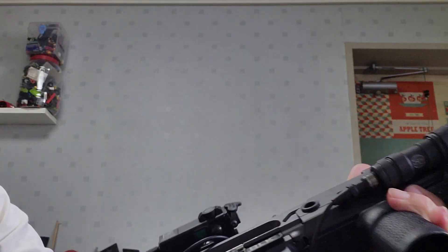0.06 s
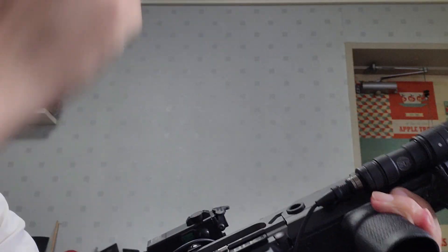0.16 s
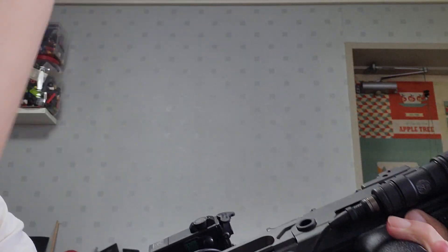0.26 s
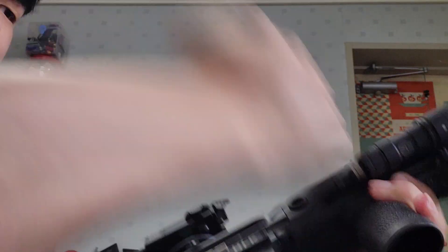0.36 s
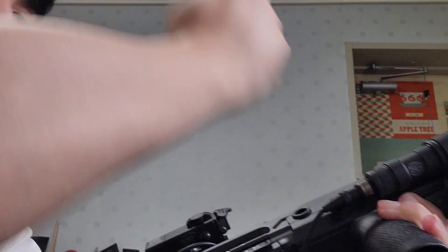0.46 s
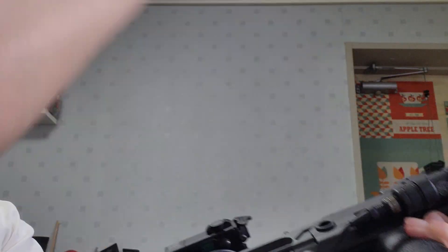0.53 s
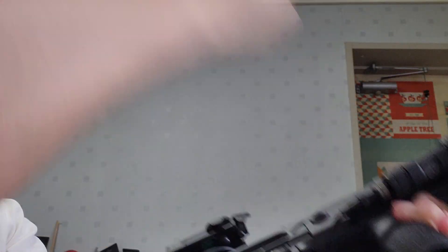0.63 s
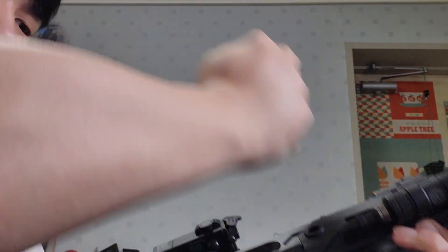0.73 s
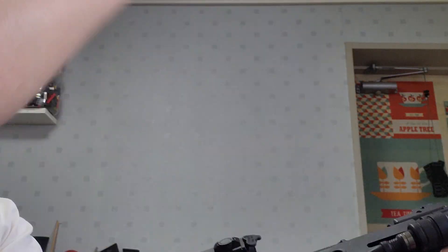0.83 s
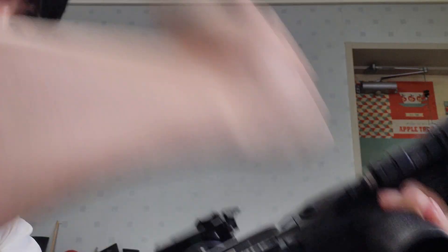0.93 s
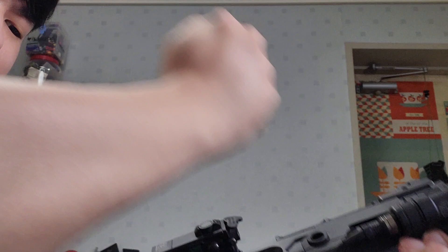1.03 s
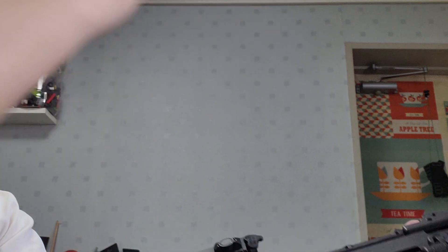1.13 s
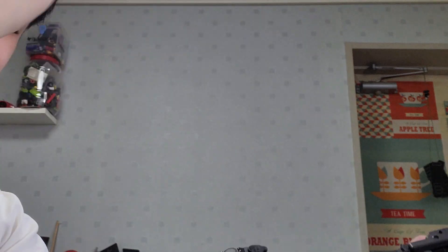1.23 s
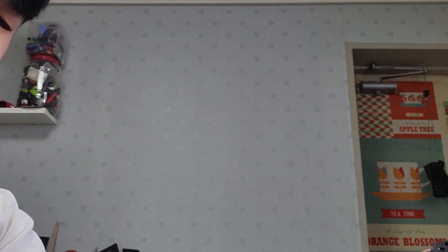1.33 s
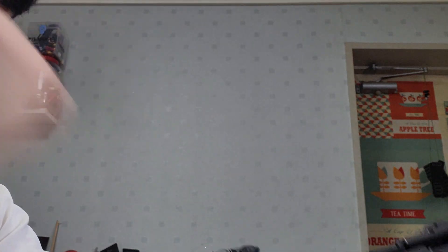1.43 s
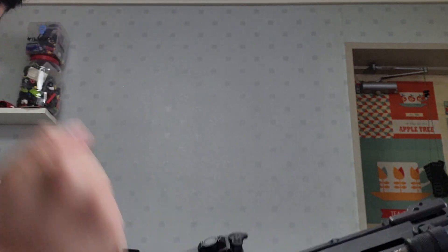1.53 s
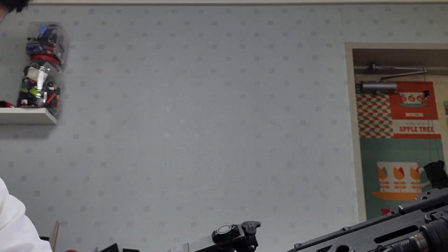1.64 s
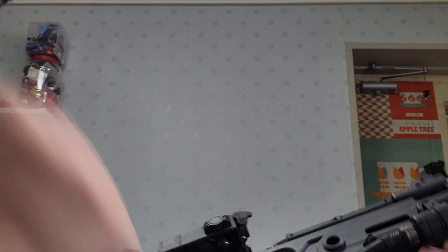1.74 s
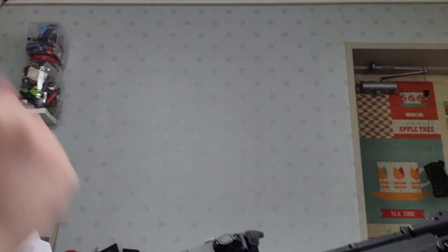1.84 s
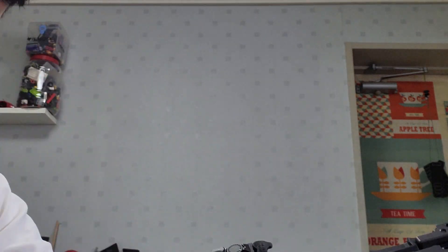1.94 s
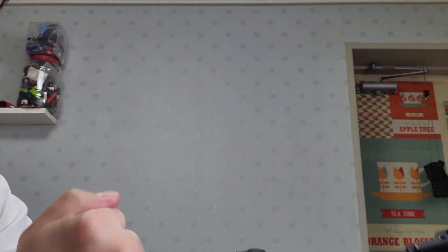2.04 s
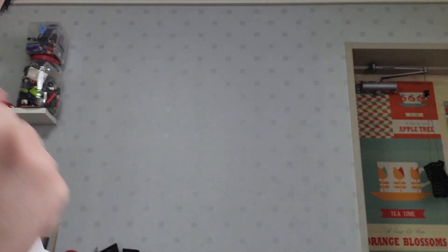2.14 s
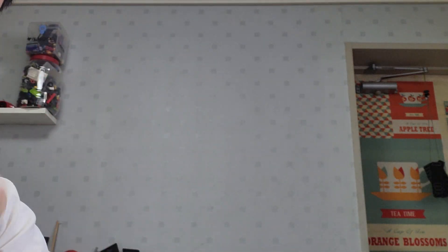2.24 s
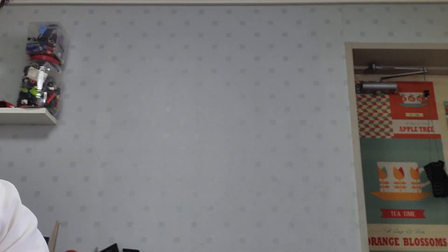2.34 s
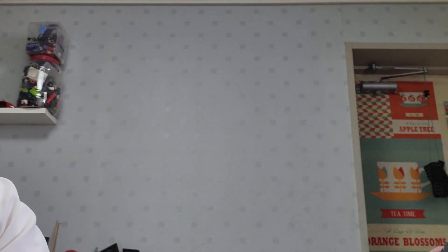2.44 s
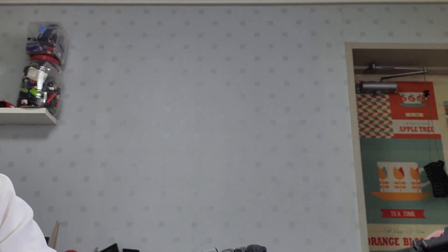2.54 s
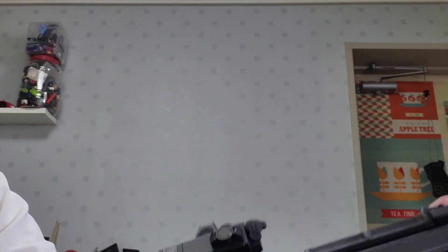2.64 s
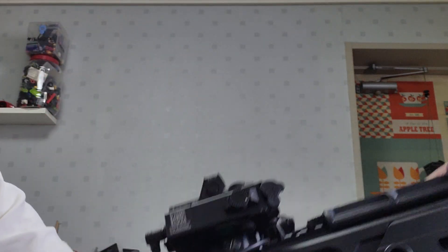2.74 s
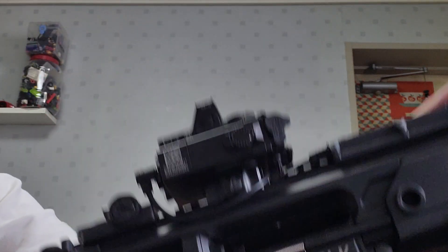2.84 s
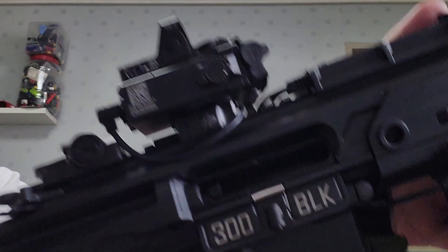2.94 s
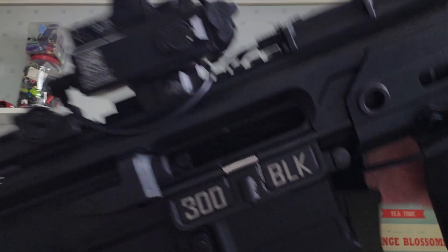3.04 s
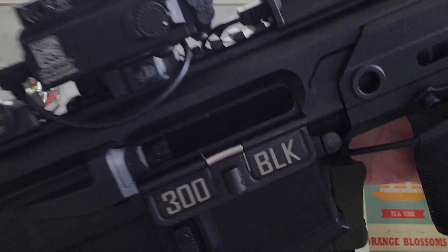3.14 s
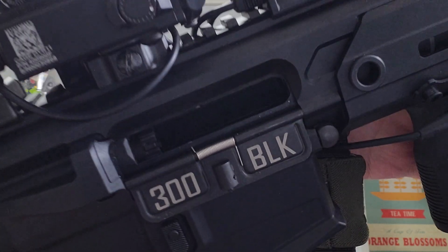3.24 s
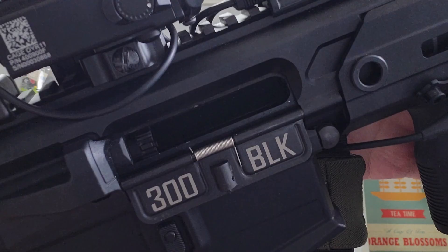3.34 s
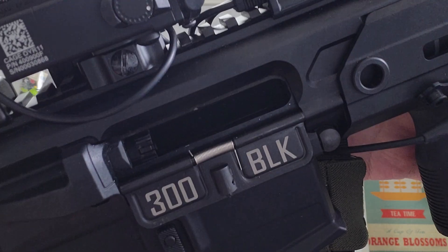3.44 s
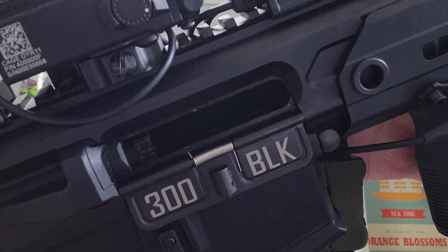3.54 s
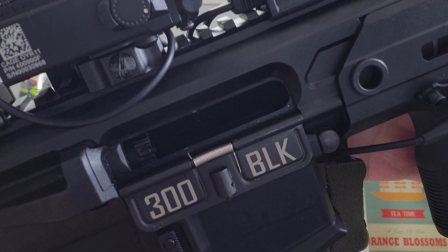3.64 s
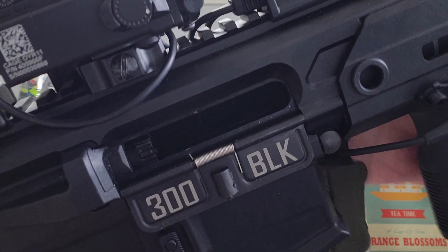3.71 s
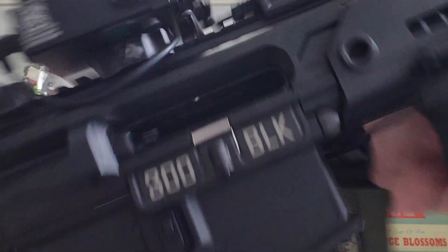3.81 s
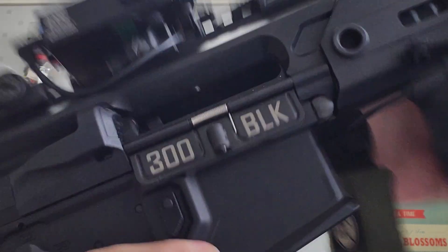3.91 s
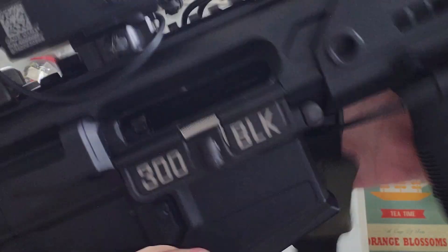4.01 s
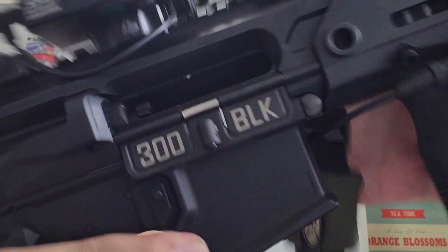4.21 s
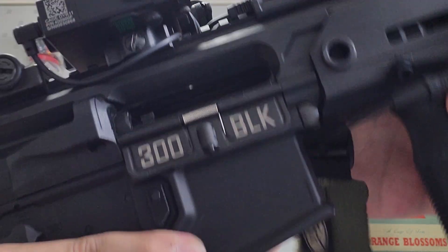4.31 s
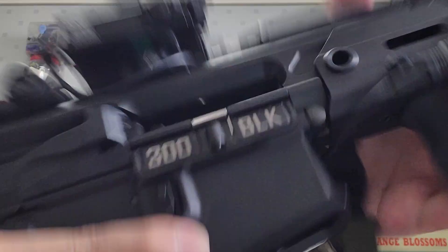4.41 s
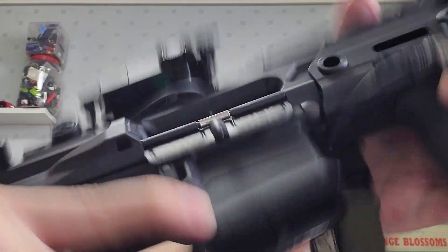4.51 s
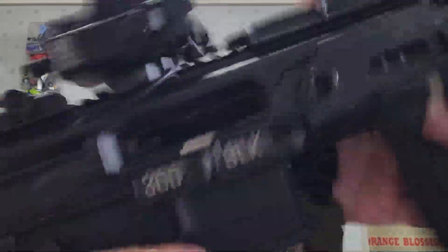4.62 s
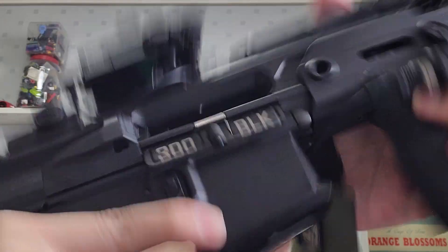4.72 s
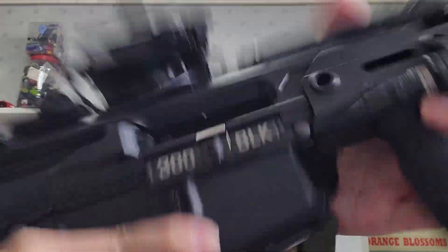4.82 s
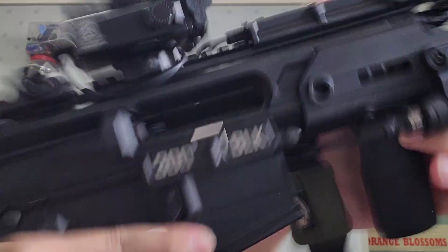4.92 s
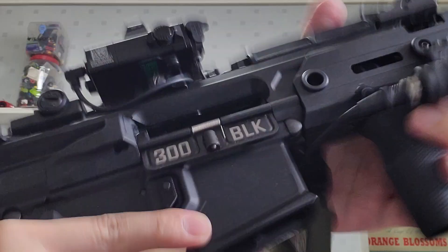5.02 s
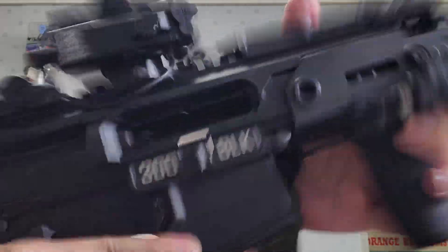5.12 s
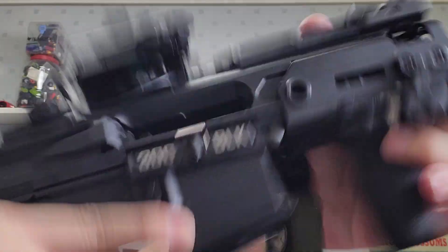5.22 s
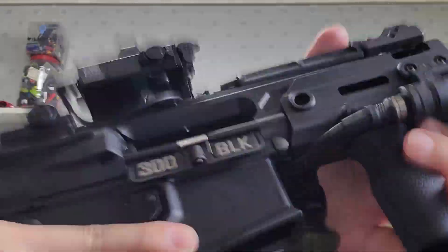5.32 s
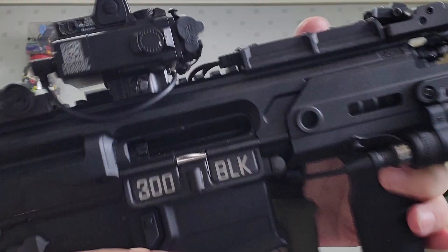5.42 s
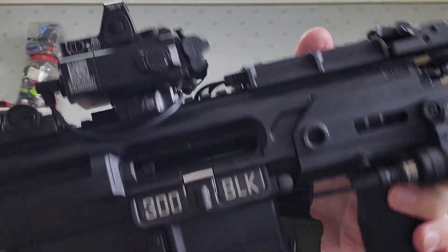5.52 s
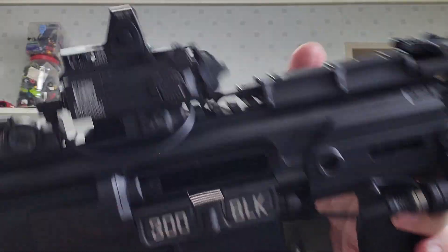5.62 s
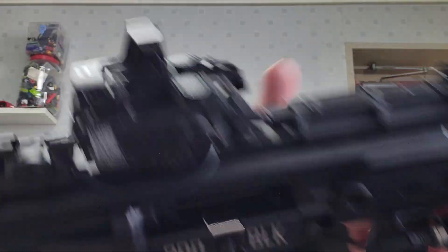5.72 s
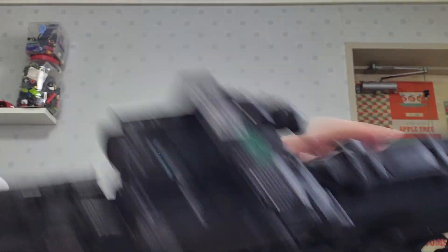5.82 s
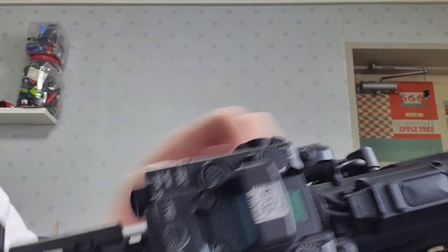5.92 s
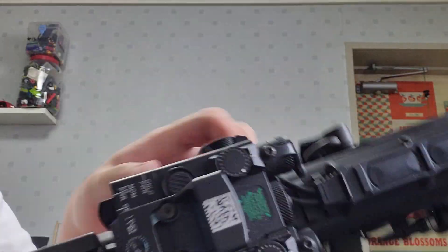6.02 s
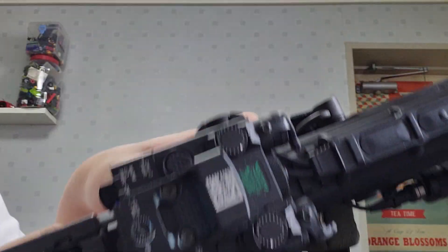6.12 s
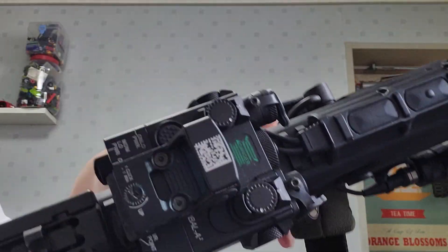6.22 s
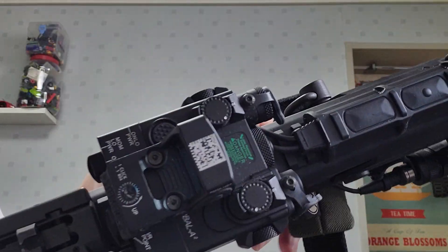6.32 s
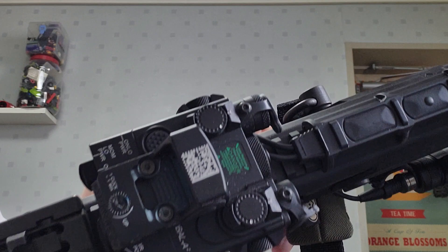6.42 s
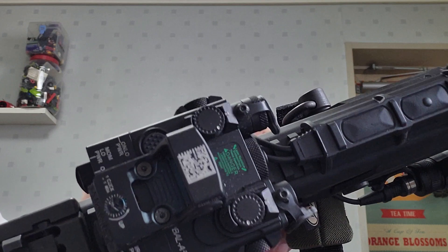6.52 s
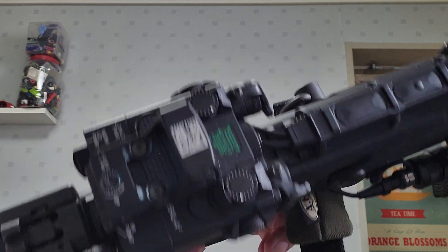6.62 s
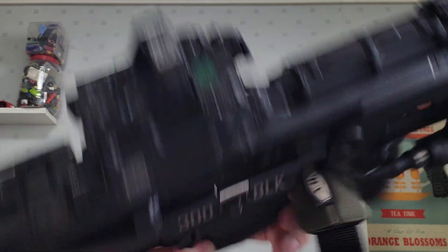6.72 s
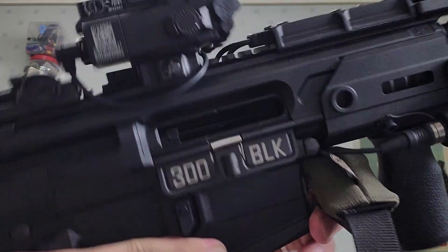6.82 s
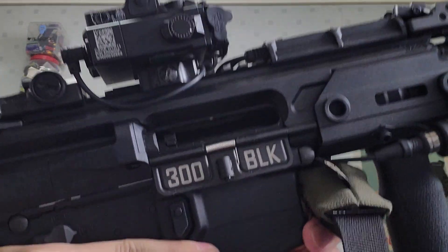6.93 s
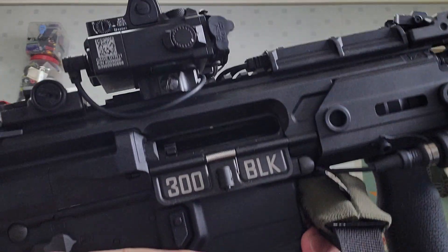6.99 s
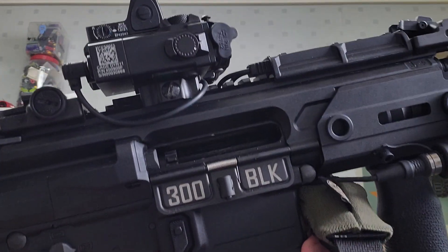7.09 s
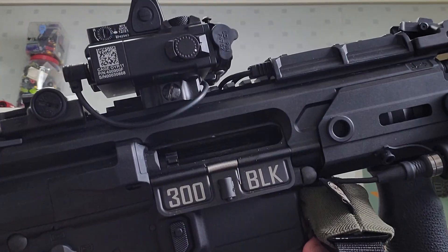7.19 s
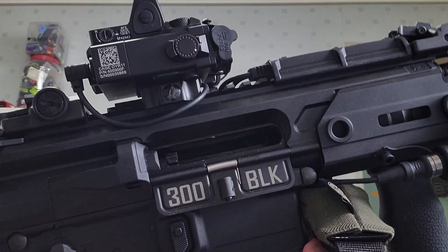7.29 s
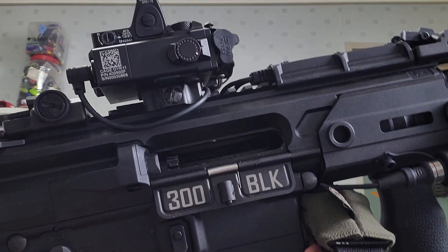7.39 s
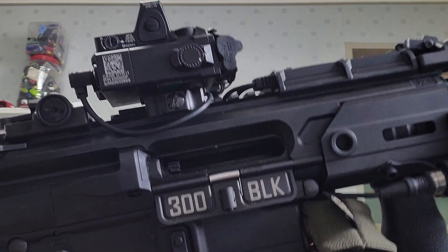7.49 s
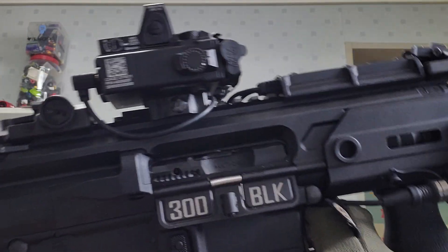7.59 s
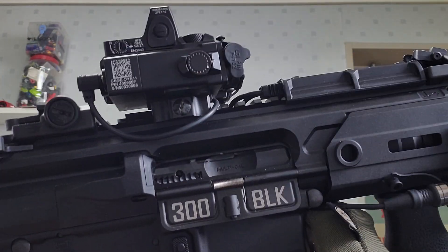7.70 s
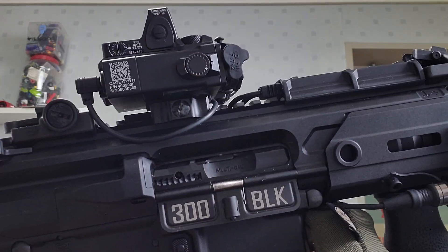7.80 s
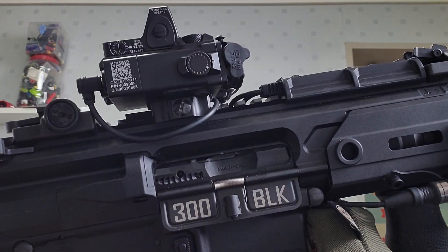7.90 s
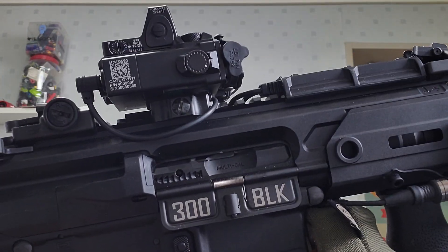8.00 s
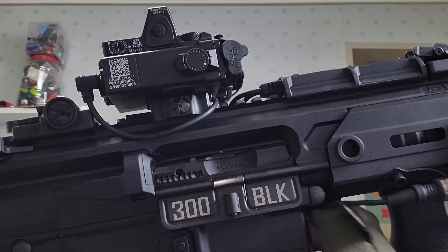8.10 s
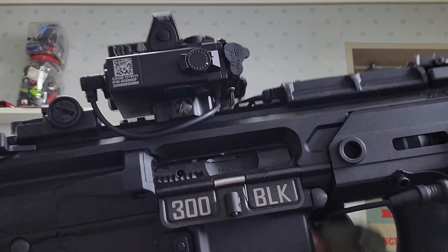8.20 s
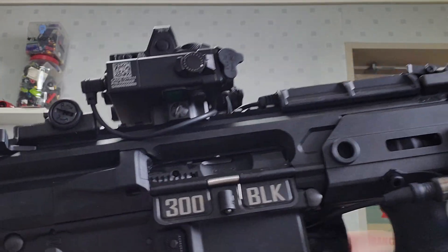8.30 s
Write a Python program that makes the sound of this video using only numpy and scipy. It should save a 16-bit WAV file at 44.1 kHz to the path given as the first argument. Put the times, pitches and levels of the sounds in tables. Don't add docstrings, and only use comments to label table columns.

```python
import sys
import numpy as np
from scipy import signal
from scipy.fft import rfft, irfft
from scipy.io import wavfile
from scipy.ndimage import map_coordinates

SR = 44100
rng = np.random.default_rng(int(sys.argv[2]) if len(sys.argv) > 2 else 0)


def store_pcm(level_fs):
    pcm = np.round(np.clip(level_fs, -1, 1) * 32767).astype(np.int16)
    wavfile.write(sys.argv[1], SR, np.atleast_2d(pcm).T)


def boost_factor(decibels):
    exponent = np.asarray(decibels, float) / 20
    return 10 ** exponent


N = 368235

# (frequency [Hz], density [dB/Hz])
HUM_SPECTRUM = [(15, -50.5), (25, -11), (58, 5), (91, -3.5), (119, 6.5), (300, -6), (357, -3.5), (468, -5),
                (649, -9.5), (1350, -18), (2500, -32), (3250, -47.5), (5500, -120)]
# (frequency [Hz], density [dB/Hz])
HISS_SPECTRUM = [(880, -36.5), (1600, -13), (2100, -8), (2680, -8), (3120, -16.5), (4340, -28),
                 (9410, -29.5), (15100, -25.5), (16500, -40)]
# (time [s], level [dB])
MACHINE_LEVEL = [(0, -92.5), (2.3, -88.5), (3.4, -85), (6.5, -67.5), (7.55, -69.5), (7.75, -100),
                 (8.35, -100)]
# (time [s], level [dB])
FAN_LEVEL = [(5.4, -100), (5.75, -65), (6.4, -67), (7.5, -68), (7.6, -100)]
# (frequency [Hz], width [Hz], level [dB])
FAN_PEAKS = [(365, 30, 0), (450, 30, 2), (2100, 110, -11), (2450, 130, -20), (2730, 30, -16)]
# (time [s], pitch [Hz], level [dB])
BEARING_WHINE = [(5.6, 2750, -100), (5.8, 2745, -77), (6.6, 2725, -77), (7.0, 2670, -81), (7.5, 2650, -86),
                 (7.6, 2650, -110)]
# (time [s], pitch [Hz], level [dB])
SPRING_SQUEAK = [(7.24, 8700, -110), (7.27, 9200, -86), (7.31, 10050, -78), (7.44, 10200, -74),
                 (7.5, 8900, -77.5), (7.53, 8500, -110)]

# (frequency [Hz], density [dB/Hz])
CLOTH_SPECTRUM = [(410, -27.5), (700, -4.5), (974, -2.5), (1810, -4), (2100, -5), (9000, -5), (12700, -7),
                  (15700, -13), (16500, -34.5)]
# (time [s], rustle level [dB])
MOTION = [(0, -71), (1.2, -71), (1.46, -79), (3.41, -79.5), (3.79, -72.5), (4.1, -61), (4.45, -64),
          (4.6, -49), (4.85, -46), (5.25, -46), (5.56, -63.5), (6.29, -71), (6.4, -100), (6.65, -80),
          (7.1, -78.5), (7.8, -85.5), (8.0, -95), (8.35, -90)]
# (time [s], peak level [dB], half length [s])
SWISHES = [(0.073, -63, 0.034), (0.318, -71, 0.029), (0.593, -57.5, .04), (0.896, -58, 0.021),
           (1.174, -59, 0.038), (1.391, -76, 0.021), (2.05, -74, .25), (2.626, -73, 0.0083),
           (2.729, -62, 0.066), (2.885, -63, 0.094), (3.1, -66, 0.019), (3.18, -75, 0.025),
           (3.9, -68.5, 0.051), (4.036, -71, .03), (4.162, -63, 0.026), (4.59, -59, 0.01),
           (5.212, -42, 0.011), (5.456, -58, 0.077), (5.748, -55, 0.12), (6.082, -67.5, 0.024),
           (6.79, -62, 0.05), (6.868, -65.5, 0.075)]

# (time [s], deep boom [dB], upper boom [dB])
THUMPS = [(0.443, -29, -40), (0.732, -31, -39.5), (1.016, -32.5, -40.5), (1.528, -41, -32.5),
          (1.803, -36, -32.5), (2.063, -39.5, -32), (4.218, -41, -59), (4.729, -48.5, -61.5),
          (4.809, -37, -57), (4.964, -39, -69.5), (5.127, -41.5, -39), (5.3, -47, -42), (6.077, -74.5, -48),
          (7.556, -37, -39.5), (7.593, -46, -54)]
# (time [s], small parts [dB], stock knock [dB], decay [ms])
TICKS = [(0.0248, -32.5, -46, 3.5), (0.6144, -38, -41.5, 1.8), (0.9111, -50, -43, 2.5),
         (1.198, -57, -55.5, 1.9), (2.8009, -52, -38.5, 1.8), (2.8384, -53, -47.5, 2.4),
         (5.5329, -47.5, -42, .9), (5.591, -45, -48, 4.4), (5.6112, -49, -42.5, 2.3),
         (5.8366, -51, -37, 2.1), (5.9917, -54.5, -33, 2.3), (6.0555, -73, -38, 2.2),
         (6.0722, -40, -34, 2.2), (6.15, -61, -56, 3.8), (6.252, -62, -64.5, 3), (6.2659, -69.5, -61, 5.8),
         (6.297, -62.5, -62.5, 3.1), (6.7696, -38, -33, 1.36), (6.774, -55, -30, 1.4),
         (6.8476, -58, -46.5, 9.9), (6.8749, -50.5, -37, 0.85), (7.5332, -50.5, -37.5, 2.2),
         (8.1278, -78, -78, 3.1), (8.1983, -51, -69, 2.1), (8.2727, -39, -46, 2.9)]
# (time [s], small parts [dB], stock knock
# [dB], decay [ms])
STIR = [(3.9904, -43, -42, 1.9), (4.0126, -51.5, -32, 4.1), (4.0432, -36.5, -40, 3.8),
        (4.062, -45.5, -56, 2.5), (4.0835, -42, -50, 2.4), (4.1337, -44, -35.5, 1.74),
        (4.1767, -26.5, -36.5, 2), (4.216, -42.5, -25.5, 2.5), (4.2657, -40, -49, 1.5),
        (4.157, -38, -54, 2), (4.145, -52, -45, 2), (4.252, -41, -50, 2.5), (4.328, -64, -47, 3),
        (4.073, -48, -50, 2), (3.958, -62, -52, 2), (4.279, -37, -44.5, 1.7), (4.3903, -46, -42, 2.3),
        (4.4572, -36.5, -51, 1.6), (4.4834, -36, -53.5, 3.5), (4.508, -58, -36, 1.2),
        (4.5202, -38, -34.5, 2.2), (4.563, -46, -42, 3.9), (4.6232, -47.5, -24.5, 1.8),
        (4.9411, -38, -34, 6.23), (5.168, -31, -39, 5), (5.3114, -28, -28, 2.3), (5.4085, -30.5, -36, 3),
        (4.7101, -32, -36, 4.2)]
# (time [s], small parts [dB], stock knock [dB], decay [ms])
RATTLE = [(4.587, -16, -31, 2.7), (4.6456, -23.5, -32, 1.1), (4.6506, -21, -29.5, 3),
          (4.7333, -12.5, -50, 1.5), (4.7445, -25, -23, 4), (4.7953, -30.5, -28, 4.7),
          (4.8032, -25, -33, 3.8), (4.8126, -24.5, -16.5, 2.4), (4.8332, -12, -34, 1.9),
          (4.8761, -19.5, -27, 2.1), (4.9016, -15, -40, 3.2), (4.9735, -10, -28.5, 1.6),
          (4.9928, -24.5, -28, 2.3), (5.0013, -14, -30, 2), (5.0345, -28, -38, 2.5), (5.044, -22, -40, 4),
          (5.0065, -20, -34, 2.5), (5.2063, -30, -40, 2), (5.2175, -22, -40, 1.5), (5.289, -34, -36, 2.5),
          (5.3275, -22, -34, 2.5), (4.579, -34, -32, 4), (4.5925, -31, -30, 2), (4.6625, -27, -36, 2),
          (4.679, -31, -36, 3), (4.692, -34, -33, 2.5), (4.784, -33, -42, 2), (4.909, -27, -34, 3),
          (4.925, -28, -38, 2.5), (4.84, -26, -34, 3), (5.054, -28, -29, 3.9), (5.0659, -14.5, -40.5, 1.4),
          (5.0865, -30, -32, 2.6), (5.1124, -13.5, -35, 1.5), (5.12, -16, -23.5, 1.1),
          (5.1309, -10, -24.5, 1.8), (5.1475, -26.5, -27.5, 1.3), (5.2204, -7.5, -42, 2.6),
          (5.2627, -48.5, -27, 5.1), (5.2985, -16, -24.5, 1.5), (5.3216, -15.5, -33.5, 1.1),
          (5.3346, -25.5, -36, 4.4), (5.3661, -20.5, -50, 1.4), (5.3796, -20, -35, 1.9),
          (5.4402, -21, -15, 0.23)]
# (time [s], peak level [dB], frequency [Hz])
CHINKS = [(0.0243, -24, 3070), (0.614, -28, 4810), (2.8005, -36, 3890), (2.8379, -39, 3490),
          (4.0123, -32, 2830), (4.0427, -30, 4520), (4.0831, -37, 4170), (4.1565, -28, 2710),
          (4.1764, -20, 9590), (4.2153, -27, 3960), (4.2792, -30, 6720), (4.3899, -34, 2690),
          (4.4568, -30, 14000), (4.4832, -32, 7440), (4.5201, -29, 2530), (4.587, -10, 7480),
          (4.6503, -12, 5160), (4.6624, -26, 5280), (4.7102, -13, 3930), (4.7331, -9, 11700),
          (4.7454, -19, 5180), (4.8034, -16, 5520), (4.8334, -5, 6930), (4.8763, -16, 14000),
          (4.9023, -10, 11500), (4.9731, -7, 7800), (4.9924, -14, 5800), (5.001, -12, 9060),
          (5.0444, -18, 9640), (5.0654, -13, 6960), (5.0848, -18, 7900), (5.1118, -19, 3610),
          (5.1118, -11, 5870), (5.1302, -6, 6030), (5.1474, -18, 2590), (5.1696, -23, 5610),
          (5.2061, -10, 9240), (5.221, -4, 7250), (5.2974, -14, 6040), (5.3213, -12, 5880),
          (5.3657, -17, 9670), (5.3797, -18, 11600), (5.4081, -22, 5350), (5.4385, -18, 3640),
          (7.5822, -2, 9550), (7.6064, -6, 9530)]
# (time [s], frequency [Hz], level [dB], T60 [s])
RINGING_PARTS = [(0.445, 320, -30.5, 0.089), (0.734, 320, -34.5, 0.067), (0.76, 2458, -26, 0.11),
                 (1.016, 330, -39.5, 0.094), (1.034, 2460, -28.5, 0.12), (1.804, 740, -24, 0.079),
                 (2.066, 580, -24.5, 0.065), (3.084, 1103, -52, .012), (4.811, 1250, -16.5, 0.031),
                 (5.837, 1266, -36, 0.019), (5.59, 2830, -35, .04), (5.992, 1300, -36, 0.02),
                 (5.992, 2150, -36, .02), (6.072, 1324, -35, 0.031), (6.771, 1320, -32, 0.028),
                 (6.072, 2200, -26.5, 0.021), (6.262, 2750, -45, 0.054), (6.77, 2120, -31.5, 0.04),
                 (7.555, 2480, -18, .09), (7.566, 2620, -18, .06), (0.757, 9100, -23, .06),
                 (0.754, 13500, -14, .02), (0.775, 2330, -30, .07), (0.446, 1150, -24, .04),
                 (1.53, 4300, -18, .03), (4.014, 1300, -42, .05), (4.222, 600, -36, .05),
                 (7.635, 5200, -26, .1), (8.273, 5240, -50, .2), (7.5925, 9490, -9, 0.11),
                 (7.5923, 11240, -13, 0.1), (7.6, 5150, -18, .06), (7.619, 780, -21, 0.047),
                 (8.271, 9070, -31, 0.04)]
# (time [s], level [dB])
BOLT_SLIDE = [
    (7.553, -48.5),
    (7.557, -29.5),
    (7.575, -29),
    (7.59, -30),
    (7.6, -25.5),
    (7.63, -33),
    (7.66, -61),
]
# (time [s], small parts [dB], stock knock [dB], decay [ms])
RELEASE = [
    (7.5549, -9, -28, 1.7),
    (7.5673, -21, -36, 6.3),
    (7.5771, -11, -31, 1.8),
    (7.5812, -6, -28, 2.2),
    (7.592, -3, -25, 1.6),
    (7.6007, -14, -34.5, 2.9),
    (7.6074, -11.5, -31.5, 3.2),
    (7.6183, -13.5, -30.5, 1.9),
    (7.6234, -25, -32.5, 4.2),
    (7.6325, -20.5, -35, 2.2),
]
# (time [s], blow [dB], first touch [dB], stock knock [dB])
SLAMS = [
    (0.4447, -8, -12, -21),
    (0.7336, -9, -21, -24),
    (1.0155, -9, -28, -27),
    (1.5299, -4, -17, -21),
    (1.8028, -8, -16.5, -28),
    (2.0651, -8.5, -25.5, -22),
]
# (time [s], level [dB])
REBOUNDS = [(0.4537, -11), (0.4632, -11), (0.7448, -11), (0.7548, -7), (1.0268, -12), (1.0316, -10),
            (1.539, -8), (1.5507, -21), (1.814, -7), (1.8233, -19.5), (2.0773, -8), (2.094, -22.5)]
# (frequency [Hz], density [dB/Hz])
STEEL_SPECTRUM = [(180, -45.5), (300, -16), (780, -5.5), (938, -1.5), (3970, -5.5), (5930, -5), (9330, -3),
                  (10300, -6.5), (15200, -1.5), (16500, -28.5)]
# (frequency [Hz], level [dB])
RECEIVER_MODES = [(2466, -9), (4032, -6), (5329, -8), (6487, -6), (7510, -5), (7940, -6), (8511, -5),
                  (9060, -2), (9302, -3), (9857, -8), (10930, -8), (11530, -6), (13200, -4), (13600, -2)]

# (frequency [Hz], T60 [s])
ROOM_T60 = [(100, .35), (500, 0.18), (2000, 0.23), (8000, 0.2), (16000, 0.12)]
# (time [s], lag [ms], level [dB])
LEFT_LAG = [(0, .28, -1), (2.2, .33, -1.5), (3.0, .15, -1), (4.2, .15, 0), (6.5, .15, 0), (7.0, 0.157, 1),
            (7.5, .19, 1), (7.8, .19, -.5), (8.35, .3, 0)]
# (frequency [Hz], gain [dB])
LEFT_PORT = [(30, -7.5), (120, -2.5), (300, 0.5), (1300, -1.5), (2500, 0.5), (10500, 1), (13000, -9.5)]
# (frequency [Hz], gain [dB])
MICROPHONE = [(20, -0.5), (9000, -2), (13500, -2), (15800, 0), (16050, -14), (17000, -33.5)]

MACHINE_HUM_DB, ROOM_HUM_DB, ROOM_HUM_UNTIL_S = 6.5, -76, 6.4
HANDLING_DB, HANDLING_PER_MOTION_DB = -13, 0.72
AIR_DB, AIR_RE_MOTION_DB = -81, -5
RISE_RATE, FALL_RATE = 2.5, 1.6
SHAKE_FROM_S, SHAKE_TO_S = 4.8, 5.42
LOOSE_DB, LOOSE_STOCK_DB, LOOSE_SPREAD_DB, LOOSE_MS = -37, -37, 3, 2.5
CHINK_DB, CHINK_T60_S = -13, .016
TOUCH_BEFORE_MS, TOUCH_MS, BLOW_MS, REBOUND_MS = 3, 2.4, 2.6, 1.6
TOUCH_STOCK_DB, REBOUND_STOCK_DB, CHATTER_STOCK_DB = -9, -18.5, -9
CHATTER_DB, CHATTER_LOSS_DB = -13.5, 2.4
CHATTER_AFTER_MS, CHATTER_GAP_MS, CHATTER_MS = 13, 5.5, 2.1
RECEIVER_WIDTH_HZ, RECEIVER_DB = 70, 1


def rms_one(x):
    return x / np.sqrt(np.mean(x ** 2) + 1e-20)


def in_time(rows):
    s, *columns = np.transpose(rows)
    return [np.interp(np.arange(N) / SR, s, c) for c in columns]


def at_hz(points, hz):
    table_hz, values = np.array(points).T
    return np.interp(np.log(hz), np.log(table_hz), values)


def colour(x, spectrum):
    hz = np.linspace(0, SR / 2, 2049)
    gain = boost_factor(at_hz(spectrum, np.maximum(hz, 1)))
    cepstrum = irfft(np.log(gain + 1e-5))
    cepstrum[1:2048] *= 2
    cepstrum[2049:] = 0
    return signal.oaconvolve(x, irfft(np.exp(rfft(cepstrum))))[:N]


def noise(spectrum):
    return rms_one(colour(rng.standard_normal(N), spectrum))


def band(x, low_hz, high_hz):
    sos = signal.butter(2, [low_hz, high_hz], "band", fs=SR, output="sos")
    return signal.sosfilt(sos, x) * np.sqrt(SR / 2 / (high_hz - low_hz))


def resonance(x, hz, width_hz):
    r = np.exp(-np.pi * width_hz / SR)
    poles = [1, -2 * r * np.cos(2 * np.pi * hz / SR), r * r]
    return signal.lfilter([(1 - r * r) / 2, 0, (r * r - 1) / 2], poles, x)


def drift(rate_hz):
    r = np.exp(-80 * np.pi * rate_hz / SR)
    slow = signal.lfilter([1], [1, -2 * r, r * r], rng.standard_normal(N // 40 + 2002))[2000:]
    return np.interp(np.arange(N) / 40, np.arange(len(slow)), rms_one(slow))


def wavering_sine(hz, level_db):
    return np.sqrt(2) * boost_factor(level_db) * np.sin(2 * np.pi * np.cumsum(hz) / SR)


def hum(motion_db, machine_db):
    handling = boost_factor(HANDLING_DB + HANDLING_PER_MOTION_DB * motion_db)
    room_hum = boost_factor(ROOM_HUM_DB) * (np.arange(N) < ROOM_HUM_UNTIL_S * SR)
    level = np.hypot(handling + room_hum, boost_factor(machine_db + MACHINE_HUM_DB))
    return level * boost_factor(2.5 * drift(36)) * noise(HUM_SPECTRUM)


def hiss(motion_db, machine_db):
    top = rms_one(band(rng.standard_normal(N), 10500, 16000))
    air_db = np.minimum(AIR_DB, motion_db + AIR_RE_MOTION_DB)
    return boost_factor(machine_db) * noise(HISS_SPECTRUM) + boost_factor(air_db) * top


def fan():
    air = rng.standard_normal(N)
    level_db, = in_time(FAN_LEVEL)
    peaks = sum(boost_factor(db) * rms_one(resonance(air, hz, width_hz)) for hz, width_hz, db in FAN_PEAKS)
    return boost_factor(level_db) * rms_one(peaks)


def rustle(motion_db):
    t = np.arange(0, N, 32) / SR
    brushes = sum(boost_factor(db) * np.exp(-((t - s) / half_s) ** 2) for s, db, half_s in SWISHES)
    level = boost_factor(motion_db) + np.interp(np.arange(N) / SR, t, brushes)
    return level * boost_factor(2.5 * drift(25)) * noise(CLOTH_SPECTRUM)


def background():
    motion_db, machine_db = in_time(MOTION) + in_time(MACHINE_LEVEL)
    return hum(motion_db, machine_db) + rustle(motion_db) + hiss(motion_db, machine_db) + fan()


def whine():
    hz, db = in_time(BEARING_WHINE)
    return wavering_sine(hz + 8 * drift(15), db + 3 * drift(8))


def squeak():
    hz, db = in_time(SPRING_SQUEAK)
    return wavering_sine(hz, db + 2.5 * drift(30))


def thumps():
    deep, upper = np.full((2, N), 1e-18)
    for s, deep_db, upper_db in THUMPS:
        at = round(s * SR)
        deep[at] = boost_factor(deep_db + 54)
        upper[at] = boost_factor(upper_db + 54)
    soft = signal.butter(2, 190, fs=SR)
    return signal.lfilter(*soft, resonance(deep, 52, 35) + resonance(upper, 120, 50))


def contacts(rows, walls_db, shiver_db, shiver_s):
    trains, force = np.full((3, N + 2048), 1e-18), np.zeros(N + 2048)
    t = np.arange(2048) / SR
    for (s, parts_db, stock_db, ms), grit in zip(rows, rng.standard_normal((len(rows), 3, 2048))):
        age = 1000 * t / max(ms, .3)
        shape = (1 - np.exp(-RISE_RATE * age)) * np.exp(-FALL_RATE * age) * 2.3
        at = round(s * SR)
        levels_db = [parts_db, (parts_db + stock_db) / 2 + walls_db, stock_db]
        trains[:, at:at + 2048] += boost_factor(np.array(levels_db) + 3)[:, None] * grit * shape
        force[at:at + 2048] += (boost_factor(max(levels_db[:2])) * shape) ** 2
    parts, walls, stock = trains[:, :N]
    keep = np.exp(-2 * np.log(1000) / (shiver_s * SR))
    energy = signal.lfilter([1 - keep], [1, -keep], force[:N] + 1e-18)
    energy = signal.lfilter([.004], [1, -.996], energy)
    shiver = np.sqrt(energy) * boost_factor(shiver_db + 2.5 * drift(140)) * noise(STEEL_SPECTRUM)
    knock = band(stock, 400, 2000)
    knock = knock + boost_factor(-2.5) * resonance(stock, 840, 220) - boost_factor(-7) * resonance(stock, 1900, 340)
    clank = band(walls, 2300, 6000) + boost_factor(-4.0) * resonance(walls, 2500, 400)
    return band(parts, 5800, 16000) + clank + boost_factor(-1.5) * knock + shiver


def loose_rows(count=12):
    when = rng.random(count)
    parts, stock = rng.normal(0, LOOSE_SPREAD_DB, (2, count))
    times_s = SHAKE_FROM_S + (SHAKE_TO_S - SHAKE_FROM_S) * when
    return [(s, LOOSE_DB + p, LOOSE_STOCK_DB + q, LOOSE_MS) for s, p, q in zip(times_s, parts, stock)]


def rings():
    out, t = np.zeros(N + SR // 2), np.arange(SR // 5) / SR
    parts = RINGING_PARTS + [(s, hz, db + CHINK_DB, CHINK_T60_S) for s, db, hz in CHINKS]
    for (s, hz, db, t60_s), phase in zip(parts, rng.random(len(parts))):
        pair = np.sin(2 * np.pi * hz * t) + .4 * np.sin(2 * np.pi * (hz * 1.012 * t + phase))
        out[round(s * SR):][:len(t)] += boost_factor(db - 60 * t / t60_s) * pair
    return out[:N] * boost_factor(4 * drift(130) - 1)


def release():
    level_db, = in_time(BOLT_SLIDE)
    sliding = level_db > BOLT_SLIDE[0][1]
    scrape = boost_factor(level_db + 3 + 4.5 * drift(150)) * noise(STEEL_SPECTRUM) * sliding
    return contacts(RELEASE, walls_db=0.45, shiver_db=-5.5, shiver_s=0.078) + scrape


def slam_rows():
    rows = [(s, db, db + REBOUND_STOCK_DB, REBOUND_MS) for s, db in REBOUNDS]
    for (s, db, touch_db, stock_db), chance in zip(SLAMS, rng.uniform(-1, 1, (len(SLAMS), 4, 2))):
        rows.append((s - TOUCH_BEFORE_MS / 1000, touch_db, touch_db + TOUCH_STOCK_DB, TOUCH_MS))
        rows.append((s, db, stock_db, BLOW_MS))
        for k, (late, loud) in enumerate(chance):
            after_ms = CHATTER_AFTER_MS + CHATTER_GAP_MS * (k + late / 4)
            level_db = db + CHATTER_DB - CHATTER_LOSS_DB * k + 2 * loud
            rows.append((s + after_ms / 1000, level_db, level_db + CHATTER_STOCK_DB, CHATTER_MS))
    return rows


def receiver(x):
    modes = sum(boost_factor(db) * (-1) ** k * resonance(x + 1e-18, hz, RECEIVER_WIDTH_HZ)
                for k, (hz, db) in enumerate(RECEIVER_MODES))
    return x + boost_factor(RECEIVER_DB) * modes


def rifle(slam, loose):
    slams = contacts(slam, walls_db=-3.15, shiver_db=0.4, shiver_s=0.15)
    home, ringing = release(), rings()
    close = contacts(STIR + RATTLE + loose, walls_db=1.2, shiver_db=-9.5, shiver_s=0.029)
    close = close + contacts(TICKS, walls_db=4, shiver_db=-12, shiver_s=0.044)
    to_room = boost_factor(-15.5) * slams + boost_factor(-10.5) * home + boost_factor(-11) * close + boost_factor(-24) * ringing
    return receiver(slams + home + close) + ringing + room(to_room)


def room(x):
    t, tail = np.arange(SR // 2) / SR, 0
    for low_hz in 40 * 2. ** np.arange(9):
        octave = signal.butter(2, [low_hz, min(2 * low_hz, .45 * SR)], "band", fs=SR, output="sos")
        decay = boost_factor(-60 * t / at_hz(ROOM_T60, 1.4 * low_hz))
        tail = tail + signal.sosfilt(octave, rng.standard_normal(len(t))) * decay
    tail = tail * np.clip((t - .002) / 0.0033, 0, 1)
    return signal.fftconvolve(x, tail / np.linalg.norm(tail))[:N]


def ports(shared, other):
    lag_ms, level_db = in_time(LEFT_LAG)
    alike = .5
    bass = signal.lfilter(*signal.butter(1, 1200, fs=SR), shared - other)
    left = alike * shared + np.sqrt(1 - alike ** 2) * (other + .1 * bass)
    late = map_coordinates(left, [np.arange(N) - lag_ms * SR / 1000], order=3, mode="nearest")
    return np.array([boost_factor(level_db) * colour(late, LEFT_PORT), shared])


def scene():
    boom, slam, loose = thumps(), slam_rows(), loose_rows()
    right = background() + whine() + squeak() + rifle(slam, loose)
    right = right + boom + boost_factor(-8.0) * room(boom)
    other = background() + rifle(slam, loose) - boost_factor(-12) * boom + boost_factor(-6) * room(boom)
    return ports(right, other)


def roll_off(x):
    return signal.sosfilt(signal.butter(12, 16800, fs=SR, output="sos"), x)


def record(dry):
    x = np.array([colour(port, MICROPHONE) for port in dry])
    return roll_off(np.clip(x, -1, 1))


dry = scene()
out = record(dry)
store_pcm(out)
```